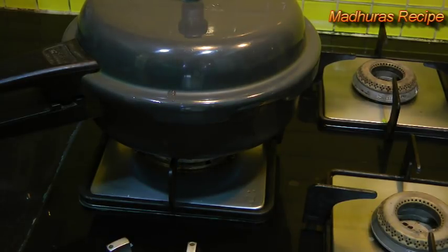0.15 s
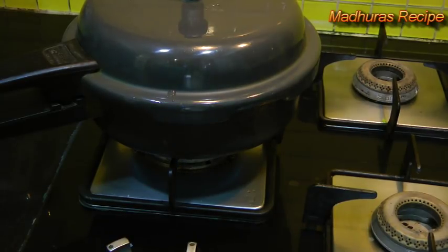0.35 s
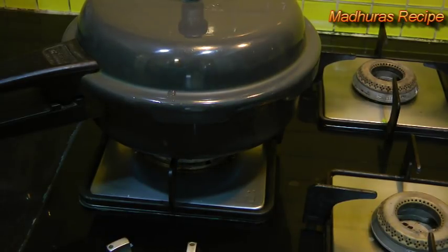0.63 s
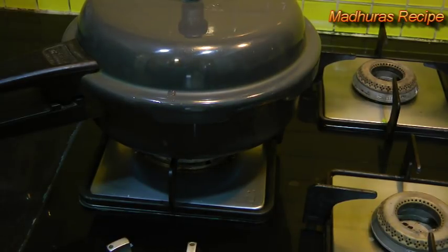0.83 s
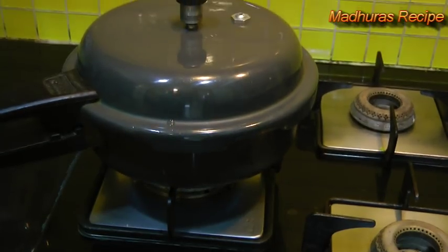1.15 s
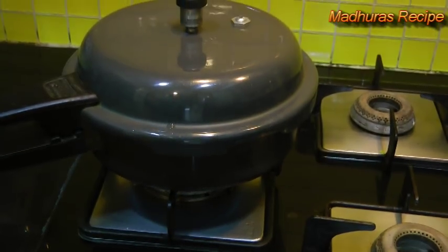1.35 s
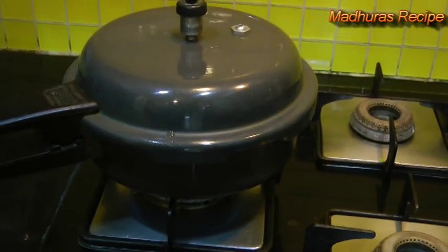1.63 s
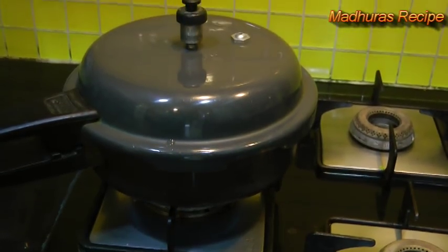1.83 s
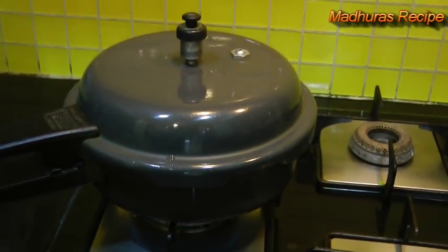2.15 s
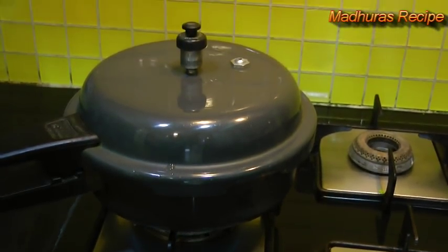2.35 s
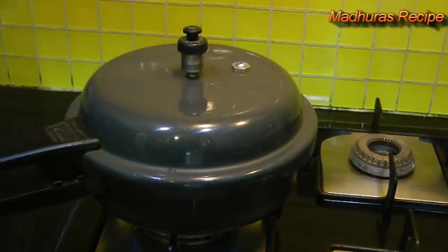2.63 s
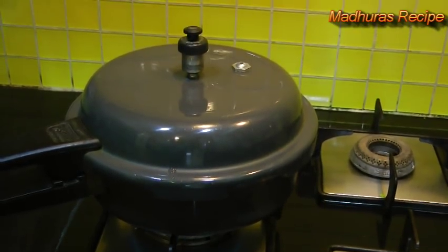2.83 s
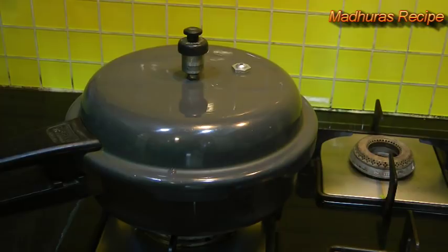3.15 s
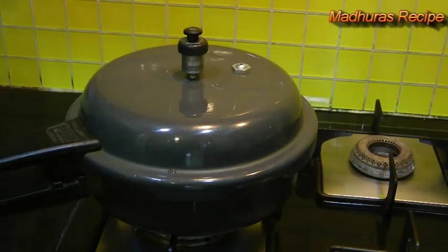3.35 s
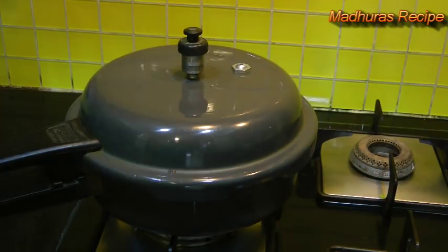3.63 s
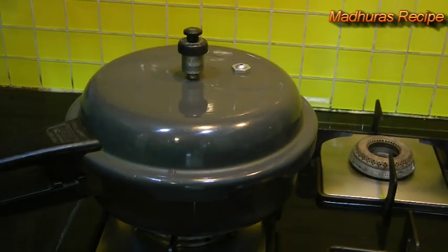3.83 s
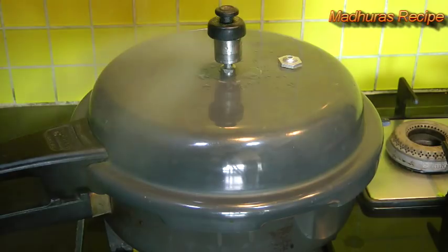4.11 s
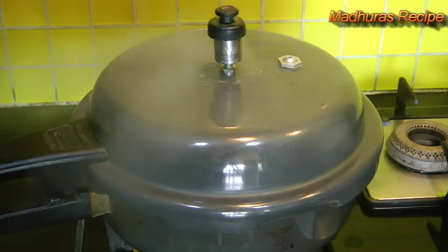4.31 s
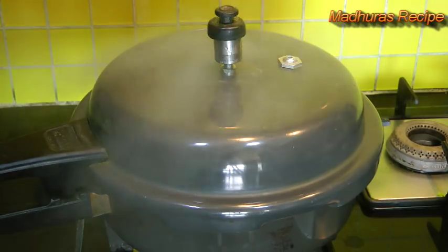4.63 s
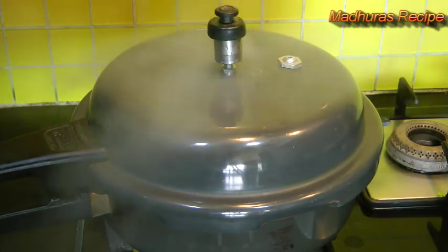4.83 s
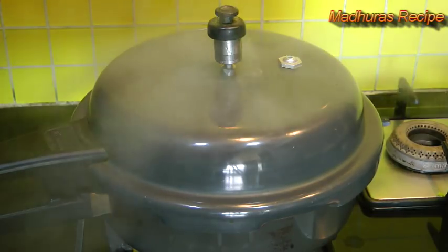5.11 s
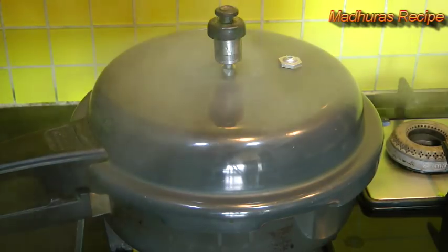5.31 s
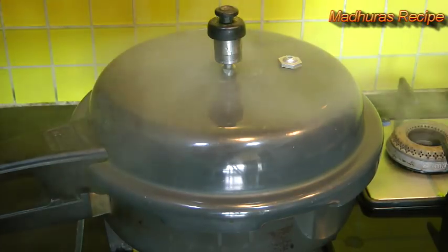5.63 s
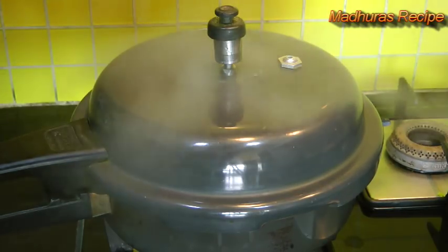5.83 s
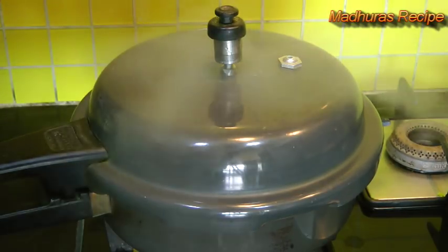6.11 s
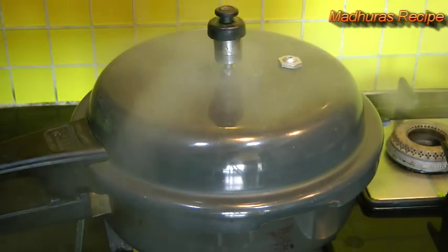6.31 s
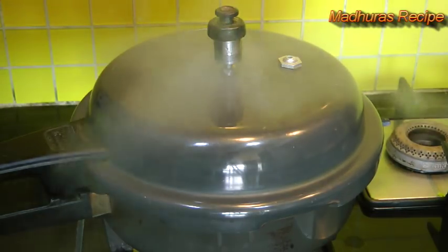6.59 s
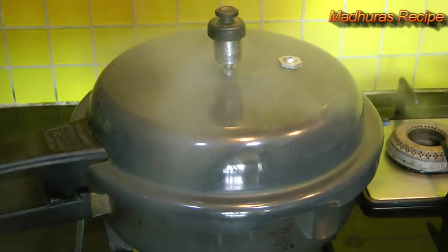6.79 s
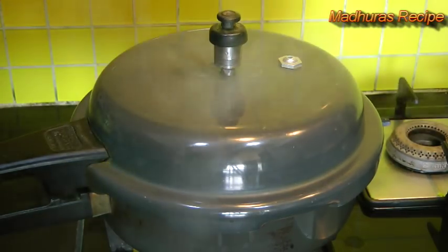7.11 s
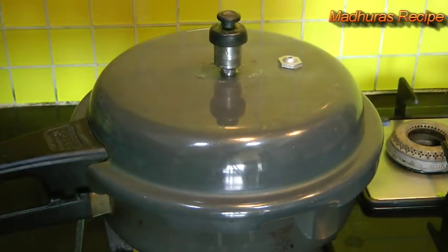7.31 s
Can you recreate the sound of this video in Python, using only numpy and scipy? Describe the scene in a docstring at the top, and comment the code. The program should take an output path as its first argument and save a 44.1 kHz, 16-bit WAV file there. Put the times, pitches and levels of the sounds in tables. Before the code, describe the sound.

After faint bumps, a pressure cooker blasts steam in a loud hiss for three seconds, then its weight drops shut with a clack.

```python
"""A tiled kitchen, with a pressure cooker on a gas stove and a hand-held camera that bumps as it is lifted.
The burner murmurs and steam seeps past the valve. Then the weight lifts and a bright jet blasts out for
three seconds, dulling as the pressure falls. The weight drops back with a clack that rings the lid,
and a thin hiss goes on. The camera's gain control holds the blast down and ducks all else with it."""
import sys
import numpy as np
from scipy import signal
from scipy.fft import rfft, irfft, next_fast_len
from scipy.io import wavfile
from scipy.ndimage import uniform_filter1d, map_coordinates

SR = 44100
rng = np.random.default_rng(int(sys.argv[2]) if len(sys.argv) > 2 else 0)


def transcribe(u):
    """Save the signal u as a 16-bit wav file named by the first command-line argument.

    u: samples, shape (n,) or (channels, n), limited to [-1, 1]; the rate is SR.
    q: integer samples, one column per channel.
    """
    v = np.clip(np.atleast_2d(u).T, -1, 1)
    q = np.round(v * 32767).astype(np.int16)
    wavfile.write(sys.argv[1], SR, q)


N = 328570
OPEN_S, SHUT_S = 3.884, 7.06  # the weight lifts, the weight drops

# Levels are relative and ahead of the gain control; a spectrum gives noise density per Hz.
# tone of the steam jet: frequency_hz, level_db
JET_SPECTRUM = [(60, -37), (200, -34.5), (450, -38), (700, -24), (1100, -18), (1700, -14.5), (2500, -14.5),
                (3600, -18), (6500, -10), (8200, 0.0), (9800, -4), (11500, -4.0), (13500, -8.5),
                (15200, -14)]
# resonances of vent, weight and lid: centre_hz, width_hz, boost_db
VENT_RESONANCES = [(424, 270, 10.4), (500, 35, 3), (736, 43, 1.2), (990, 210, 3.5), (1154, 31, 1.4),
                   (2027, 280, 7.25), (2190, 160, 1.6), (2750, 380, 3.7), (3087, 740, 8.35), (3310, 58, 3),
                   (3689, 610, 8.25), (4108, 810, 9.3), (4360, 280, 2.4), (4906, 630, 6.7), (5350, 51, 5.1),
                   (5540, 850, 8.15), (5910, 81, 4.4), (6085, 74, 6.0), (6385, 400, 6.5), (6650, 57, 3.6),
                   (7040, 260, 6.2), (7580, 51, 4), (7690, 140, 2.4), (7720, 37, 6), (7830, 29, 2.7),
                   (9100, 31, 4.6)]
# hollow tone of steam in the narrowing gap: frequency_hz, level_db
GAP_SPECTRUM = [(100, -24), (350, -13), (620, 0), (1000, -13), (2500, -16)]
# the weight lands and bounces on the vent: start_s, level_db
WEIGHT_HITS = [(7.053, -5), (7.0598, 9), (7.0695, -1)]
# ring of the lid: pitch_hz, level_db, t60_s
LID_MODES = [(495, 0.5, 0.12), (566, 0.5, 0.12), (625, 1, 0.11), (708, 4, 0.14), (1165, -9, 0.19),
             (1230, 1, 0.15), (1450, 1, 0.088), (1710, -6, .12), (1980, 6, 0.044), (2230, 2, .05),
             (2300, 0, .05), (2654, -15, .1)]
# crack of the blow itself: frequency_hz, level_db
CRACK_SPECTRUM = [(150, -24), (350, -9), (600, 2), (900, -6.5), (1500, 1), (2200, -2.5), (2700, -19),
                  (12000, -31)]
# hiss once the weight is back: frequency_hz, level_db
AFTER_HISS_SPECTRUM = [(120, -6), (300, 3.5), (500, -7), (1200, -4.5), (2500, -5.5), (4500, -4.5),
                       (7500, -3), (10000, -7), (12500, -12), (15000, -23)]
# steam swelling past the seated weight: start_s, length_s, level_db
SEEP_SWELLS = [(.1, 0.11, -42), (.39, 0.37, -41)]
# tone of that leak: frequency_hz, level_db
SEEP_SPECTRUM = [(300, 7.5), (1200, -11), (2500, 2), (4200, 4.5), (6000, -0.5), (9000, -2), (11500, -10),
                 (15000, -40)]
# the hands move the camera: start_s, length_s, level_db
CAMERA_MOVES = [(-.1, 0.31, -42), (.88, 0.58, -42.5), (2.42, 0.67, -35.5), (3.35, 0.52, -38)]
# handling rumble: frequency_hz, level_db
RUMBLE_SPECTRUM = [(10, 1.5), (25, -0.5), (45, -2), (90, -7.5), (160, -9.5), (280, -20.5), (600, -40),
                   (2000, -80)]
# firmer bumps of the hands on the camera: start_s, level_db, pitch_hz
HAND_BUMPS = [(.035, -24.5, 85), (.058, -24.5, 241), (.097, -29, 137), (.592, -31, 66), (.683, -28, 155),
              (.997, -26, 125), (2.458, -17, 142), (2.7, -24.5, 169), (2.763, -22, 148), (2.964, -16, 233),
              (3.057, -25, 204), (3.654, -26.5, 84), (3.842, -24, 136), (5.74, -9.5, 85)]
# skin rubbing on the camera: frequency_hz, level_db
RUB_SPECTRUM = [(20, 4), (120, 4.5), (280, -4), (500, -12.5), (1200, -25), (3000, -50)]
# ring of the knocked camera body: pitch_hz, level_db, t60_s
KNOCK_MODES = [(127, -16, 0.08), (252, -20, 0.15), (615, -22, 0.026), (1150, -29, 0.043)]
# small ticks of the camera's shell: start_s, level_db, t60_s
SHELL_TICKS = [(.99, -34, .25), (2.755, -28, .06), (2.96, -30, .2), (3.283, -36, .05)]
# tone of those ticks: frequency_hz, level_db
SHELL_SPECTRUM = [(1000, -20), (4000, -9), (5300, 2), (7000, -1), (9000, -9), (15000, -20)]
# soft rustles as the camera moves: start_s, length_s, level_db
RUSTLE_SWELLS = [(1.18, 0.11, -42), (3.59, .16, -38.5)]
# tone of the rustles: frequency_hz, level_db
RUSTLE_SPECTRUM = [(200, -11), (420, -4.5), (650, -12), (1050, 0.5), (1400, -9), (2400, -16), (4000, -23),
                   (10000, -40)]
# steady rush of the flame: frequency_hz, level_db
FLAME_SPECTRUM = [(300, -2), (500, -3.5), (1000, -4), (2200, -8), (4000, -18), (6000, -19.5),
                  (10000, -12.5), (11500, -21), (13000, -23.5), (15200, -28)]
# resonances of the burner: centre_hz, width_hz, boost_db
BURNER_RESONANCES = [(713, 184, 16.6), (1398, 250, 12.7), (1813, 71, 16.7), (2646, 93, 8.4),
                     (3270, 38, 11.3), (3443, 440, 13.2), (3956, 290, 9.3), (4460, 380, 11.8),
                     (5380, 610, 8), (6030, 202, 5.3), (7239, 640, 8.5), (8900, 88, 5.1), (9823, 130, 8.9),
                     (13795, 700, 6.0)]
# reverb time of the tiled room: frequency_hz, t60_s
KITCHEN_DECAY = [(200, 0.64), (700, 0.53), (2000, 0.46), (6000, 0.58), (10000, 0.36), (15000, 0.46)]


def steam_jet(full_db=9, lift_s=0.9, sink_s=0.19, attack_s=0.0028, release_s=0.011):
    """Turbulent steam through the vent: falling pressure dulls it, the riding weight makes it flutter."""
    t = clock()
    open_for_s = np.clip(t, OPEN_S, SHUT_S) - OPEN_S
    lifting = np.exp(-open_for_s / lift_s)
    sinking = np.exp((OPEN_S + open_for_s - SHUT_S) / sink_s)
    level_db = full_db - 7 * lifting - 7 * sinking  # weaker while the weight sits low
    brightness = 0.92 - 0.34 * open_for_s - 0.7 * sinking  # dB per octave
    steam = rush(JET_SPECTRUM, VENT_RESONANCES)
    steam = tilted(steam, brightness + 0.33 * wobble(20))  # the treble shimmers
    gap = np.clip((t - OPEN_S) / attack_s, 0, 1) * np.exp(-np.maximum(t - SHUT_S, 0) / release_s)
    flutter_db = 0.28 * wobble(22) + 0.7 * wobble(110)
    return steam * gap * amp(level_db + flutter_db)


def narrowing_gap(peak_db=-18, swell_s=0.12, release_s=0.01):
    """As the weight sinks, the narrowing gap adds a low, hollow rush."""
    until_shut_s = SHUT_S - clock()
    swell = np.exp(-np.abs(until_shut_s) / np.where(until_shut_s > 0, swell_s, release_s))
    return amp(peak_db) * swell * rush(GAP_SPECTRUM)


def weight_clack(ring_db=-17, crack_db=-3, crack_t60_s=0.046, contact_s=0.0006, scatter_db=2.2):
    """The weight hits its seat, bounces and rings the lid."""
    out, t = np.zeros(N), np.arange(SR // 2) / SR
    attack = 1 - np.exp(-t / contact_s)
    for start_s, hit_db in WEIGHT_HITS:
        ring = np.zeros(len(t))
        for hz, mode_db, t60 in LID_MODES:
            strength = amp(mode_db + rng.normal(0, scatter_db))
            ring += strength * fade(t, t60) * np.sin(2 * np.pi * (hz * t + rng.random()))
        crack = rush(CRACK_SPECTRUM)[:len(t)] * fade(t, crack_t60_s)
        add(out, start_s, amp(hit_db) * (amp(ring_db) * ring + amp(crack_db) * crack) * attack)
    return out


def after_hiss(level_db=-30, flutter_db=2):
    """The dropped weight does not seal at once: a thin, bright hiss goes on."""
    return (clock() > SHUT_S) * amp(level_db - flutter_db * wobble(11.5)) * rush(AFTER_HISS_SPECTRUM)


def valve_seep():
    """Two soft swells of steam squeeze past the seated weight as the pressure builds."""
    return swells(SEEP_SWELLS, attack_s=0.095, release_s=0.075) * rush(SEEP_SPECTRUM)


def handling(rest_db=-46.5, rub_db=-8, tick_trim_db=-11, bump_t60_s=0.14, knock_s=2.999):
    """Hands on the camera: rumble, dull bumps with a little rubbing, one hard knock, and shell ticks."""
    motion = swells(CAMERA_MOVES, attack_s=0.1, release_s=0.1)
    out = np.hypot(motion, amp(rest_db)) * amp(1.2 * wobble(18)) * rush(RUMBLE_SPECTRUM)
    t = np.arange(SR) / SR
    attack = 1 - np.exp(-t / 0.0013)
    rub, shell = rush(RUB_SPECTRUM), rush(SHELL_SPECTRUM)
    for start_s, db, hz in list(HAND_BUMPS) + finger_shifts(motion):
        skin = np.roll(rub, -round(start_s * SR))[:len(t)]
        bump = np.sin(2 * np.pi * hz * t) + amp(rub_db) * skin
        add(out, start_s, amp(db) * bump * fade(t, bump_t60_s) * attack)
    knock = sum(amp(db) * np.sin(2 * np.pi * hz * t) * fade(t, t60) for hz, db, t60 in KNOCK_MODES)
    add(out, knock_s, attack * knock)
    for start_s, db, t60 in SHELL_TICKS:
        tick = np.roll(shell, -round(start_s * SR))[:len(t)]
        add(out, start_s, amp(db + tick_trim_db) * tick * fade(t, t60))
    return out


def finger_shifts(motion, per_s=8, boost_db=6, pitch_hz=165.7, scatter_db=2.5, scatter_octaves=0.3):
    """Small random finger bumps that follow the camera's motion: rows of start_s, level_db, pitch_hz."""
    count = int(per_s * N / SR)
    start_s = (np.arange(count) + rng.random(count)) * N / SR / count
    force, detune = rng.standard_normal((count, 2)).T
    motion_db = 20 * np.log10(np.interp(start_s, clock(), motion) + 1e-9)
    level_db = motion_db + boost_db + scatter_db * force
    return list(zip(start_s, level_db, pitch_hz * 2 ** (scatter_octaves * detune)))


def camera_sway(jolt_s=0.93, gain_db=-12, pitch_hz=20.86, t60_s=1.0, attack_s=0.04):
    """The jolted camera swings and settles: a deep flutter."""
    t = np.maximum(clock() - jolt_s, 0)
    attack = 1 - np.exp(-(t / attack_s) ** 2)
    return amp(gain_db) * np.sin(2 * np.pi * pitch_hz * t) * fade(t, t60_s) * attack


def rustle():
    """Two soft, dull rustles, like a sleeve sliding as the camera moves."""
    return swells(RUSTLE_SWELLS, attack_s=0.043, release_s=0.086) * rush(RUSTLE_SPECTRUM)


def burner(level_db=-40, flicker_db=1):
    """The flame's steady murmur, coloured by the burner's resonances."""
    return amp(level_db + flicker_db * wobble(7.75)) * rush(FLAME_SPECTRUM, BURNER_RESONANCES)


def kitchen_reverb(x, drift_hz=4, steady_db=-5):
    """Diffuse kitchen reverb, mostly drifting between tails so it sounds smooth; a small part holds still."""
    blend = np.pi * wobble(drift_hz)
    drifting = tile_tail(x * np.cos(blend)) + tile_tail(x * np.sin(blend))
    return (amp(steady_db) * tile_tail(x) + drifting) / np.hypot(1, amp(steady_db))


def tile_tail(x):
    """A fresh, diffuse tail off the tiles; the top end dies first."""
    hz, t, bands = signal.stft(rng.standard_normal(SR * 3 // 4), SR, nperseg=256)
    decay = fade(t, along(KITCHEN_DECAY, hz)[:, None])
    tail = signal.istft(bands * decay, SR, nperseg=256)[1]
    return signal.fftconvolve(x, tail / np.linalg.norm(tail))[:N]


def gain_control(x, ceiling_db=-12, release_db_per_s=14, window_s=0.023):
    """The gain ducks at once when the level passes the ceiling, then creeps back."""
    power = np.abs(uniform_filter1d(x.mean(0) ** 2, int(window_s * SR)))
    recovery_db = release_db_per_s * clock()
    held_db = np.maximum.accumulate(10 * np.log10(power + 1e-12) + recovery_db) - recovery_db
    return x * amp(np.minimum(ceiling_db - held_db, 0))


def rush(spectrum, resonances=()):
    """Noise of rms 1 with a broad spectrum and resonant humps on it."""
    def response(hz):
        humps_db = sum(db / (1 + (2 * (hz - centre) / width) ** 2) for centre, width, db in resonances)
        return amp(along(spectrum, hz) + humps_db)
    noise = filtered(rng.standard_normal(N), response)
    return noise / np.sqrt(np.mean(noise ** 2) + 1e-20)


def swells(rows, attack_s, release_s):
    """An envelope of swells: each rises, holds to its end and dies away."""
    t = clock()
    envelope = np.zeros(N)
    for start_s, length_s, db in rows:
        attack = np.clip((t - start_s) / attack_s, 0, 1)
        release = np.exp(-np.maximum(t - start_s - length_s, 0) / release_s)
        envelope += amp(db) * attack * release
    return envelope


def tilted(x, db_per_octave):
    """A gentle, moving tilt EQ that pivots at 6 kHz."""
    slope = filtered(x, lambda hz: np.log(amp(np.log2(np.clip(hz, 500, 16000) / 6000))))
    return x + db_per_octave * slope


def filtered(x, response):
    """EQ x with a gain that is a function of frequency."""
    size = next_fast_len(N + SR // 2)
    return irfft(rfft(x, size) * response(np.fft.rfftfreq(size, 1 / SR)), size)[..., :N]


def along(points, hz):
    """Read a curve of (frequency_hz, value) points on a log frequency axis."""
    point_hz, values = np.transpose(points)
    return np.interp(np.log(hz + 1), np.log(point_hz + 1), values)


def wobble(rate_hz):
    """Smooth random modulation with rate_hz knots a second."""
    return map_coordinates(rng.standard_normal(int(N * rate_hz / SR) + 4), [clock() * rate_hz])


def fade(t, t60):
    """A decay of 60 dB in t60 seconds."""
    return np.exp(-np.log(1000) * t / t60)


def add(track, start_s, sound):
    """Mix a sound into the track at start_s."""
    part = track[round(start_s * SR):][:len(sound)]
    part += sound[:len(part)]


def amp(db):
    return 10 ** (np.asarray(db) / 20)


def clock():
    return np.arange(N) / SR


def scene(room_db=-5):
    """The cooker in its room, with burner and handling noise left dry; mono on both channels."""
    cooker = steam_jet() + narrowing_gap() + valve_seep() + after_hiss() + weight_clack()
    in_room = (cooker + amp(room_db) * kitchen_reverb(cooker)) / np.hypot(1, amp(room_db))
    mono = in_room + burner() + handling() + camera_sway() + rustle()
    return np.array([mono, mono])


def record(dry, peak_limit=0.82, cutoff_hz=15450):
    """The camera's gain control, a soft clip for stray peaks, and its band limit."""
    ducked = gain_control(dry)
    clipped = ducked / (1 + (ducked / peak_limit) ** 8) ** (1 / 8)
    return filtered(clipped, lambda hz: hz < cutoff_hz)


dry = scene()
out = record(dry)
transcribe(out)
```